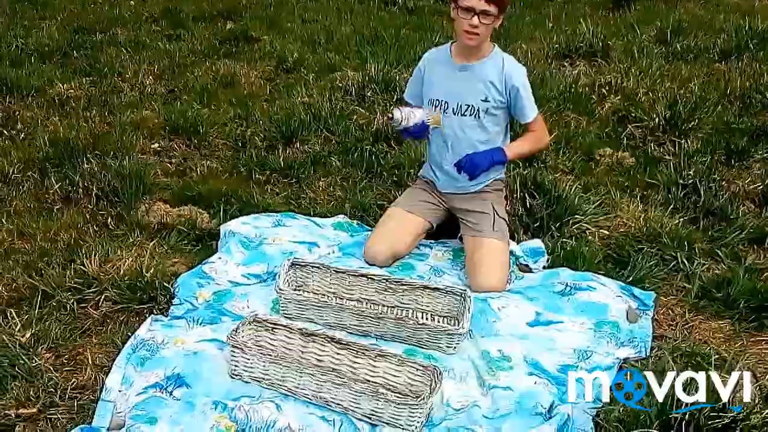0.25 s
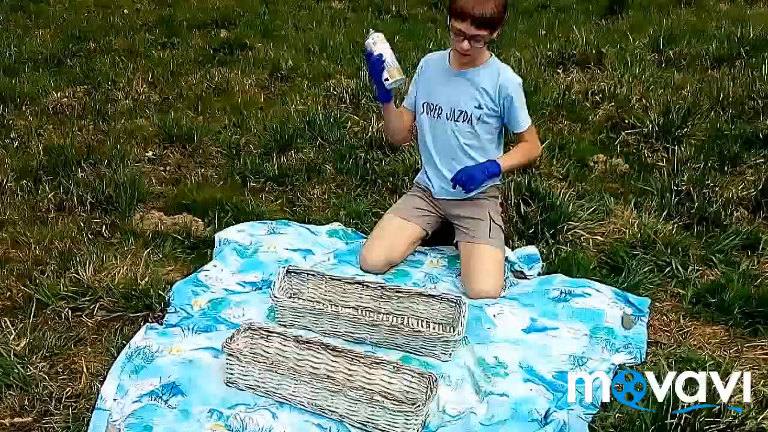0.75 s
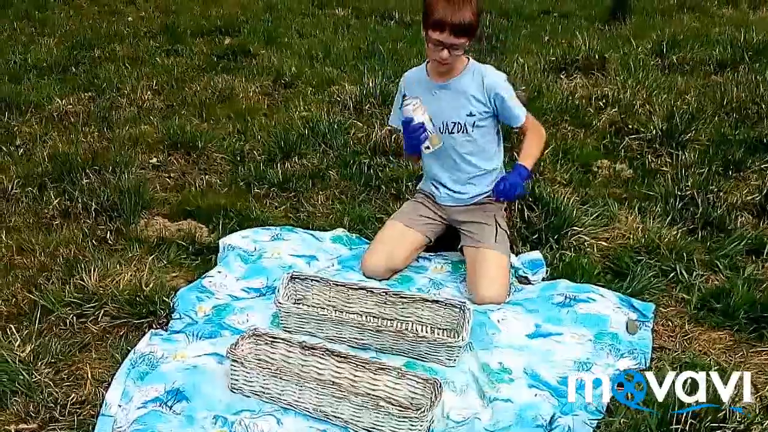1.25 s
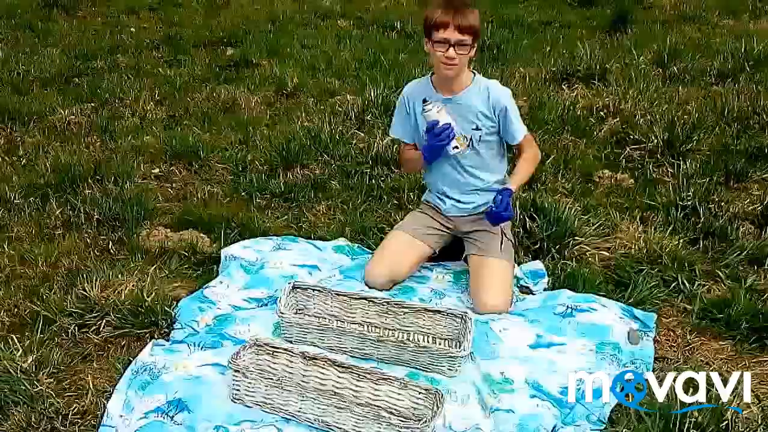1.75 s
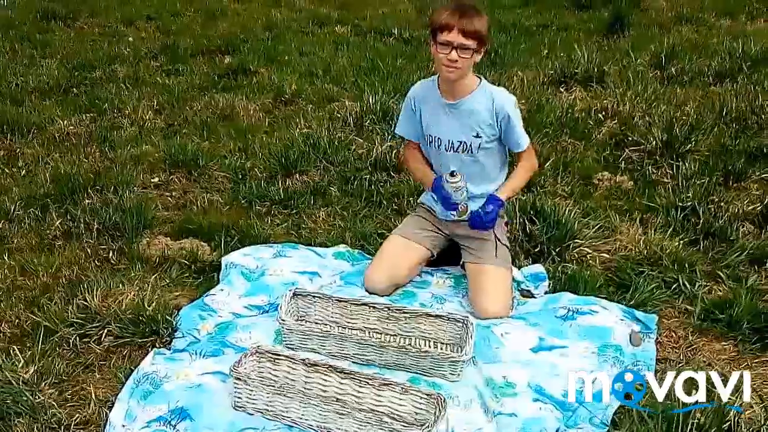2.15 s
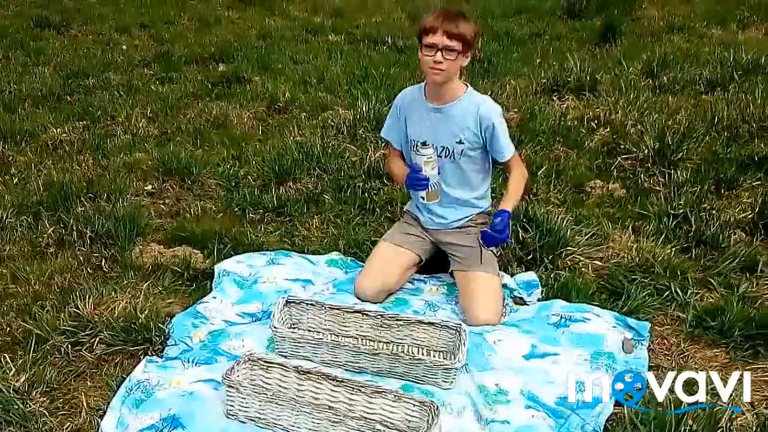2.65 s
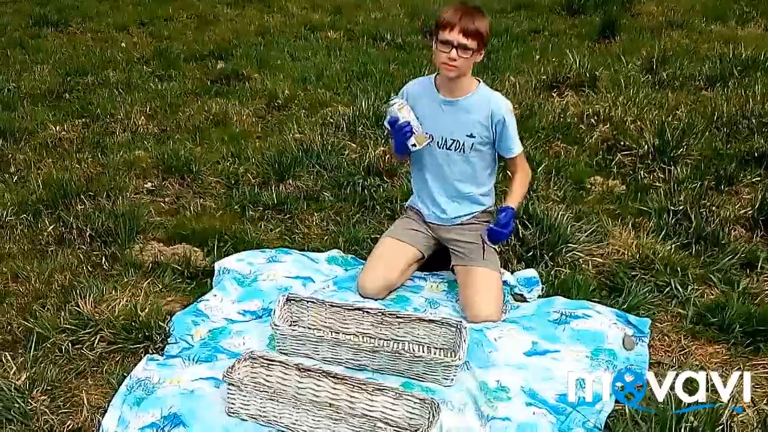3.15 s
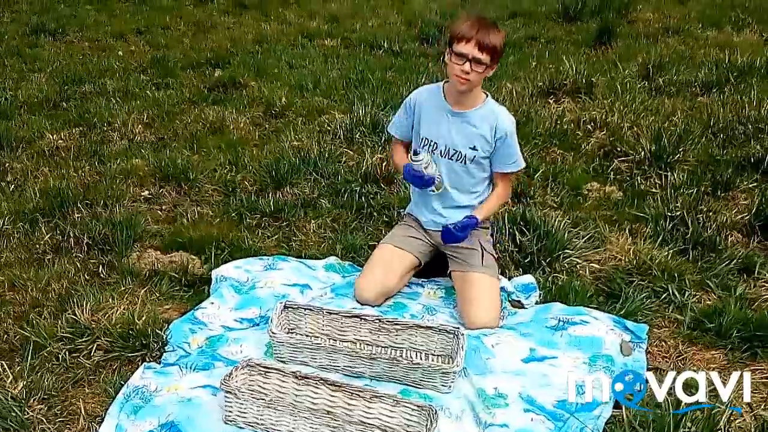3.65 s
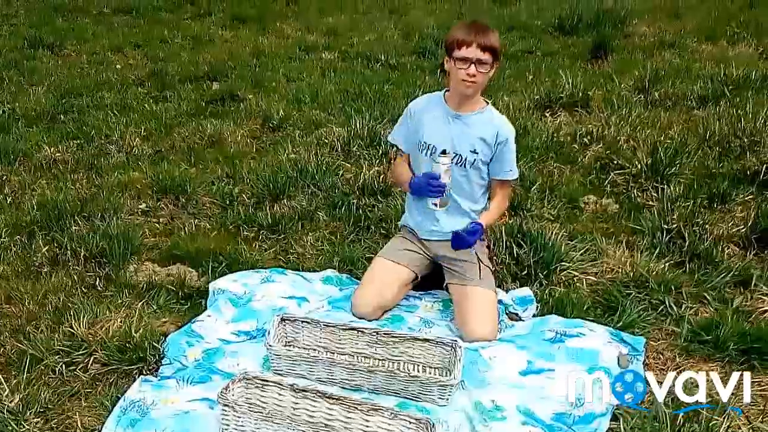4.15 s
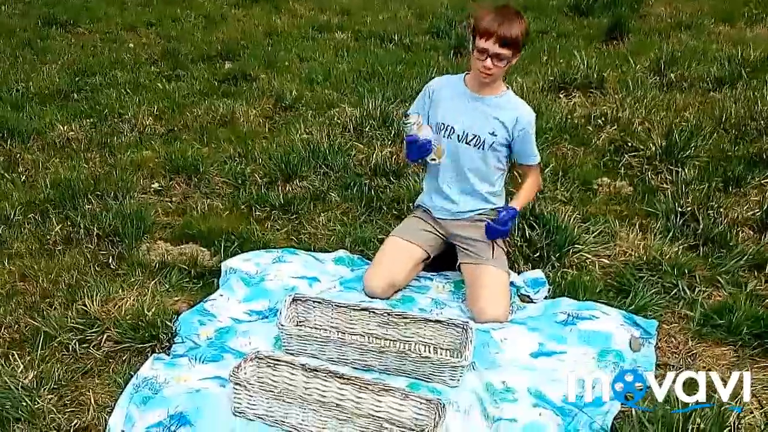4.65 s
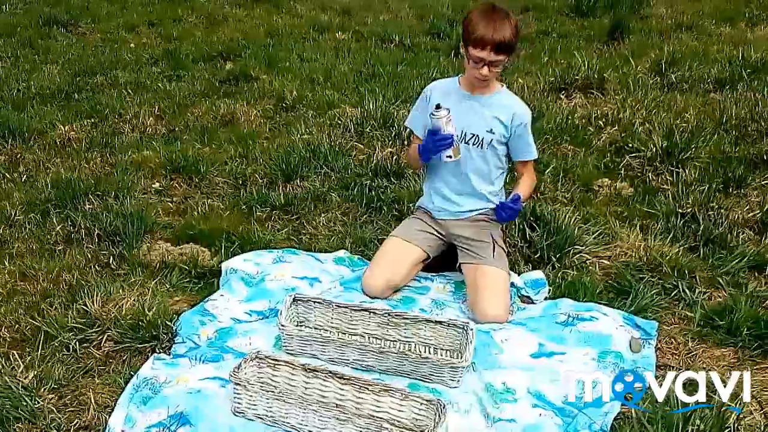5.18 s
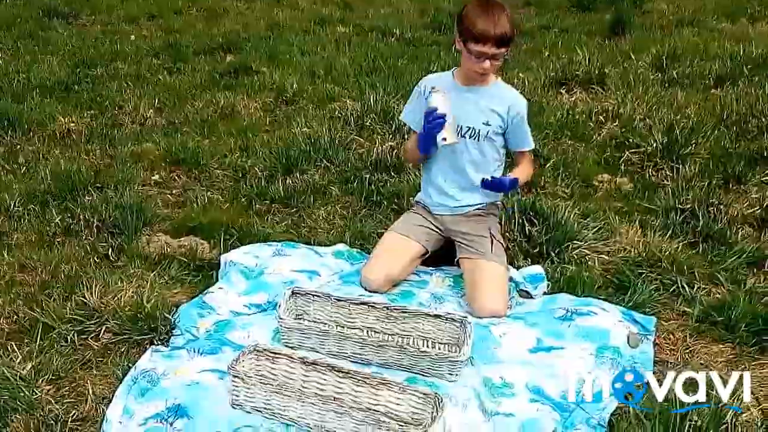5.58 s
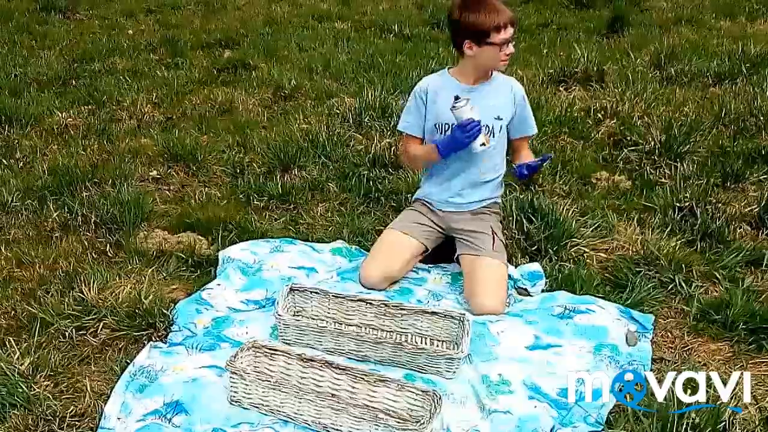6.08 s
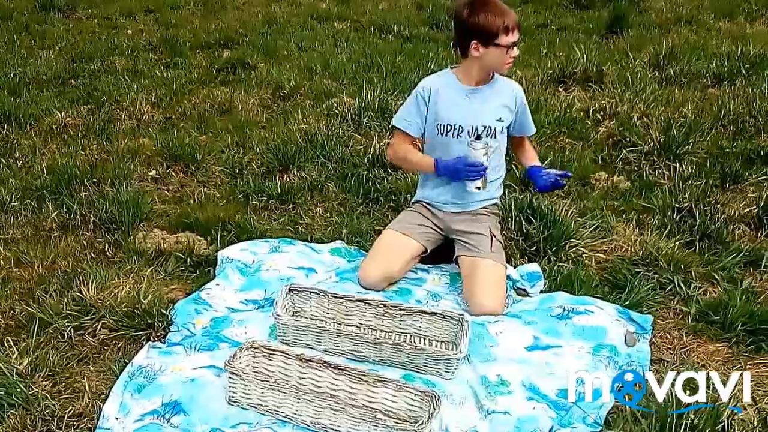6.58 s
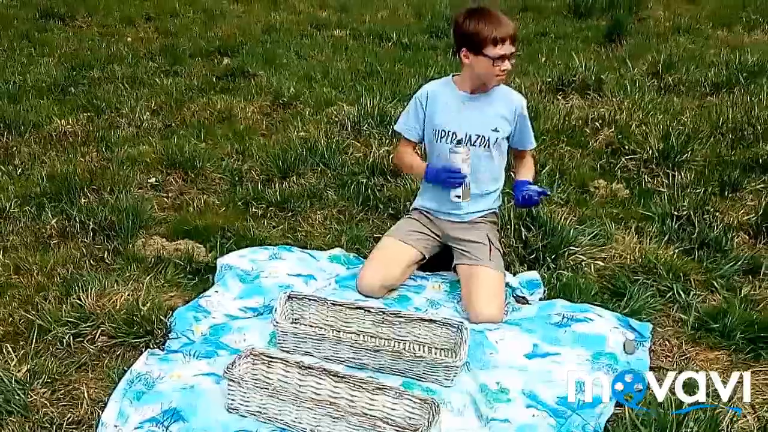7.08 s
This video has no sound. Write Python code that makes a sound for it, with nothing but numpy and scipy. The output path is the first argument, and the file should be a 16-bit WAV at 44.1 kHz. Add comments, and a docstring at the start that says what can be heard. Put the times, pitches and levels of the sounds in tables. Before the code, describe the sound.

A spray paint can is shaken by hand in an open meadow, its mixing ball clacking in uneven metallic rattles to the end over faint birds

```python
"""Open air with a faint, distant rumble comes first, then far bird notes and a soft bump on the microphone.
Soon a can of spray paint is shaken by hand, a few metres away in a meadow: its mixing ball knocks on the
ends and wall, exciting the can's modes, and rolls through the paint between knocks in many soft touches.
Birds are sliding sines with echoes, the air is coloured noise and the rumble two narrow noise bands.
Now and then a hand bumps or brushes the microphone's housing: short thuds, snaps and swells of noise."""
import sys
import numpy as np
from scipy import signal
from scipy.fft import rfft, irfft
from scipy.io import wavfile

SR = 44100
rng = np.random.default_rng(int(sys.argv[2]) if len(sys.argv) > 2 else 0)


def materialize(psi):
    """Save the field psi as 16-bit PCM at rate SR to the path in sys.argv[1].

    A 1-D psi becomes a single channel; in a 2-D psi each row is a channel.
    """
    bounded = np.clip(np.atleast_2d(psi).T, -1, 1)
    quanta = np.round(bounded * 32767).astype(np.int16)
    wavfile.write(sys.argv[1], SR, quanta)


N = 322812
TIME = np.arange(N) / SR

# hard knocks of the ball against the can, a few to each shake; levels before the part trims:
# start_s, cap_level_db, wall_level_db
KNOCKS = [(0.7844, -43.5, -68), (0.8001, -41, -64), (0.8239, -44.5, -72), (0.9898, -35, -58),
          (1.0004, -39, -60), (1.0112, -38.5, -60), (1.0326, -41.5, -59), (1.0654, -39, -73),
          (1.0868, -34, -50), (1.1056, -32.5, -66), (1.1138, -37, -52), (1.1242, -39.5, -51),
          (1.1386, -37, -39.5), (1.1917, -25.5, -37.5), (1.226, -45, -65), (1.374, -32.5, -47),
          (1.3928, -28.5, -52.5), (1.4186, -36, -49.5), (1.4542, -44, -41.5), (1.4664, -47, -43.5),
          (1.5207, -28, -41.5), (1.531, -33.5, -47), (1.6342, -30, -50), (1.6405, -26, -46),
          (1.6597, -39, -53), (1.6675, -29.5, -63), (1.7415, -40.5, -38.5), (1.7572, -42, -39),
          (1.7898, -34, -38), (1.8031, -30.5, -42), (1.9321, -27.5, -44.5), (1.9612, -33.5, -47.5),
          (2.0509, -30.5, -35), (2.0899, -34, -48.5), (2.2326, -27, -43.5), (2.2566, -41, -57),
          (2.3307, -30, -41), (2.3713, -41.5, -49), (2.5095, -33.5, -47), (2.5195, -39, -52),
          (2.5348, -39.5, -74), (2.6178, -30, -42.5), (2.8156, -34, -53), (2.8541, -44, -42),
          (2.8958, -30.5, -40.5), (2.9124, -36, -55), (3.0603, -29.5, -53), (3.085, -34.5, -60),
          (3.103, -39.5, -64), (3.188, -29.5, -38), (3.239, -52, -46), (3.3974, -36, -46.5),
          (3.4847, -32, -45), (3.532, -36, -46), (3.6587, -34, -49), (3.6786, -40.5, -51),
          (3.696, -39, -52), (3.7769, -30, -38), (3.7866, -33.5, -42), (3.8354, -43, -44),
          (3.941, -29, -41), (3.9756, -35.5, -56), (3.9848, -39, -63), (4.0613, -33, -42.5),
          (4.0876, -28.5, -51), (4.3801, -35.5, -44.5), (4.4427, -37.5, -51), (4.544, -35, -52.5),
          (4.5901, -40.5, -52), (4.6747, -33, -43), (4.7139, -33.5, -51), (4.7818, -45.5, -45),
          (4.8509, -29, -38.5), (4.8726, -28.5, -50), (4.9657, -34.5, -44), (4.971, -32, -42),
          (5.1691, -30.5, -62), (5.1833, -29.5, -43), (5.2084, -42.5, -60), (5.2689, -31, -39.5),
          (5.2849, -35.5, -41.5), (5.458, -40, -52.5), (5.584, -32.5, -42), (5.5904, -33.5, -43),
          (5.7537, -32, -49), (5.9026, -43.5, -62), (6.0408, -39, -47.5), (6.076, -41, -55),
          (6.1634, -34.5, -40), (6.3641, -38, -77), (6.4137, -42.5, -42), (6.4473, -38, -41.5),
          (6.462, -35.5, -42), (6.5465, -37.5, -54.5), (6.562, -37.5, -64), (6.6312, -41.5, -50.5),
          (6.7115, -34, -40), (6.7496, -42, -45.5), (7.0141, -35.5, -40), (7.041, -37.5, -44),
          (7.2209, -31, -50.5), (7.2892, -34, -39)]
# ranges in which the wall, the end caps and the contact tick sound: low_hz, high_hz
PART_RANGES = [(500, 2147), (2100, 8020), (9500, 23500)]
# modes of the can, damped by paint and hand, before each touch detunes and reweights them:
# pitch_hz, width_hz, level_db
CAN_MODES = [(776, 437, -11.5), (885, 134, -20), (1450, 230, -7), (1610, 156, -5), (2240, 104, -11),
             (2583, 284, 0), (3200, 790, -2.5), (3705, 273, 4), (4663, 810, 9.5), (5300, 180, 2),
             (5670, 1040, 4), (6620, 200, 1), (8580, 2350, -9), (12400, 2000, -13.5), (14970, 1200, -9.5)]
# paint coats the ball unevenly and dulls its tick:
# time_s, tick_above_caps_db, top_modes_db (the modes above 10 kHz)
COATING = [(0.8, -16.5, -1), (1.7, -27, 14), (2.8, -17, -2), (4.1, -18.5, 1), (4.7, -32, 11), (5.6, -34, 1),
           (6.0, -19.5, -15), (7.32, -23.5, -14)]
# once in each shake the ball runs along the wall: fastest_s, level_db
RUNS = [(1.031, -64), (1.13, -64), (1.462, -65), (2.06, -57.5), (2.319, -57.5), (2.592, -54.5), (2.88, -59),
        (3.171, -56.5), (3.451, -54.5), (3.751, -56.5), (4.02, -56), (4.2, -64.5), (4.408, -59),
        (4.63, -59.5), (4.978, -64), (5.27, -58.5), (5.532, -61), (5.829, -58.5), (6.101, -59),
        (6.44, -66.5), (6.72, -62.5), (7.02, -63), (7.271, -65.5)]
# at times the ball rattles densely and brightly, or the paint sloshes with a hiss:
# start_s, end_s, cap_level_db
FLURRIES = [(.8, .85, -54), (.99, 1.059, -48.5), (1.091, 1.166, -53), (3.41, 3.48, -56), (3.974, 4.0, -50),
            (5.819, 5.89, -60.5), (6.085, 6.149, -62.5)]
# soft bumps on the housing: start_s, level_db, pitch_hz
BUMPS = [(.238, -31.5, 206), (0.777, -43, 139.3), (1.271, -45.5, 295), (1.533, -45.5, 292),
         (1.61, -42.5, 264.5), (1.716, -42, 220.2), (2.013, -40, 358), (2.075, -43.5, 225),
         (3.938, -44.5, 356)]
# brushes over the housing: start_s, length_s, level_db
BRUSHES = [(0.317, 0.098, -52.5), (4.4, 0.115, -53.5)]
# colour of the brushes: frequency_hz, level_db (relative)
BRUSH_COLOUR = [(60, -2), (250, 0), (1500, -4), (4500, 1), (7500, -4), (11000, -15.5), (16000, -19)]
# dry snaps within a brush: start_s, peak_db
SNAPS = [(4.4098, -27.5), (4.417, -33), (4.4206, -28), (4.4277, -27), (4.497, -38)]
# high and low note of one bird's song: first_s, length_s, slide_s, start_hz, end_hz, level_db
SONG = [(0.861, 0.064, 0.0147, 5180, 4550, -51), (1.168, 0.11, 0.04, 3620, 3170, -60.5)]
# other bird notes: start_s, length_s, slide_s, start_hz, end_hz, level_db
WHISTLES = [(.21, .068, 0.025, 4560, 4500, -66.5), (.661, 0.092, .035, 3450, 3230, -65.5),
            (4.975, 0.019, 0.024, 2570, 2500, -60), (5.016, 0.03, 0.032, 3660, 3390, -61),
            (5.09, .031, .025, 2848, 2489, -62), (5.191, 0.11, 0.062, 3520, 3447, -63),
            (5.207, 0.11, .033, 5900, 5130, -60), (5.294, .03, 0.031, 4900, 3682, -56),
            (5.426, .041, .023, 4140, 4540, -56.5), (5.467, 0.035, .02, 4200, 3660, -57.5),
            (5.53, 0.029, 0.022, 4280, 3450, -64), (5.595, 0.069, 0.041, 4700, 3760, -66),
            (5.672, 0.024, .027, 4360, 3760, -53.5), (5.927, 0.099, 0.059, 2912, 2733, -61.5)]
# colour of the open air: frequency_hz, level_db (relative)
AIR_COLOUR = [(25, 14), (45, -3.5), (70, 6), (110, 0), (170, 1.5), (400, -2.5), (800, -3), (1600, -6.5),
              (3200, -8), (6000, -12), (8000, -20.5), (10500, -33), (16000, -23)]
# a distant hum: pitch_hz, level_db
HUM = [(101.5, -78), (121.6, -80)]

# the first knock after a pause lands squarely and ticks more sharply
PAUSE_S, FIRST_TICK_DB = 0.1, 5
# on average a square knock is over sooner than a glancing touch, whose tick is weaker
KNOCK_MEAN_CONTACT_MS, GLANCE_CONTACT_MS, GLANCE_TICK_DB = 1.61, 1.69, -2.5
# a hard knock is followed by a much softer rebound
REBOUND_MIN_S, REBOUND_MAX_S, REBOUND_CAP_LOSS_DB, REBOUND_WALL_LOSS_DB = 0.012, 0.045, 18, 8
# on each run the ball glances off the wall, louder than it rolls; the taps trail a little behind the swell
TAP_LAG_S, TAP_SPREAD_S, TAP_WALL_DB, TAP_CAP_DB, TAP_SCATTER_DB = 0.015, 0.1, 8, 5, 2.5
FLURRY_STEP_S, FLURRY_WALL_LOSS_DB, FLURRY_CONTACT_MS = 0.007, 15, 2.2
# late on the hand shifts its grip and the lowest modes ring more strongly
REGRIP_S, REGRIP_DB = 6.9, 4.5
# a run swells and dies away at steady rates; in between the ball keeps stirring faintly
SWELL_DB_PER_S, FADE_DB_PER_S = 115, 65
STIR_FROM_S, STIR_DB = 0.55, -69.5
# just before a knock the ball flies free and the rolling falls quiet
FLIGHT_S, FLIGHT_HUSH_DB = 0.012, 6.5
SONG_PERIOD_S = 0.506
CUTOFF_HZ = 16000


def knocks(chatter=0.11, linger=0.98, spot_db=2.0, detune=0.032, rounding=6,
           trims_db=(-0.3, -0.3, -2), usual_tick_db=-18, hardness=0.63):
    """Each touch is a contact impulse with a brief chatter; where it lands decides how the modes share it."""
    t = np.arange(1024) / SR
    level_span = 0.005 * SR  # a part's level is its loudness as if spread over 5 ms
    filters = [band_pass(low, high, order=3) for low, high in PART_RANGES]
    mode_hz = np.array(CAN_MODES)[:, 0]
    treble_octaves = np.maximum(np.log2(mode_hz / 7500), 0)
    lowest, highest = mode_hz < 1100, mode_hz > 10000
    coat_s, coat_tick_db, coat_top_db = np.transpose(COATING)
    out = np.zeros(N)
    for s, cap_db, wall_db, contact_ms, extra_tick_db in contacts():
        tick_db = cap_db + np.interp(s, coat_s, coat_tick_db) + extra_tick_db
        # an impulse, then a chatter that grows and lasts with the contact time
        chatter_decay_s = linger * contact_ms / 1000
        force = chatter * contact_ms * rng.standard_normal(len(t)) * np.exp(-t / chatter_decay_s)
        force[0] += 1
        # a weaker echo from the ground or a nearby body follows within about 2 ms
        force[np.argmin(np.abs(t - rng.uniform(0.0012, 0.0024)))] += 0.3
        # a touch cushioned by paint has a weak tick and excites the highest modes less
        bright_db = hardness * (tick_db - cap_db - usual_tick_db) * treble_octaves
        spot, shift = rng.standard_normal((2, len(CAN_MODES)))
        coat_db = np.interp(s, coat_s, coat_top_db) * highest
        grip_db = REGRIP_DB * (s > REGRIP_S) * lowest
        gains_db = spot_db * spot + bright_db + coat_db + grip_db
        ring = ring_can(force, gains_db, 1 + detune * shift, rounding)
        for sos, level_db, trim_db in zip(filters, (wall_db, cap_db, tick_db), trims_db):
            part = signal.sosfilt(sos, ring)
            part *= np.sqrt(level_span) / np.linalg.norm(part)
            add(out, s, from_db(level_db + trim_db) * part)
    return out


def contacts(taps_per_run=7):
    """Knocks, rebounds, taps and flurries as (start_s, cap_level_db, wall_level_db, contact_ms, extra_tick_db)."""
    hard, glancing, last_s = [], [], 0
    for s, cap_db, wall_db in KNOCKS:
        contact_ms = KNOCK_MEAN_CONTACT_MS * rng.uniform(0.5, 1.5)
        hard.append((s, cap_db, wall_db, contact_ms, FIRST_TICK_DB * (s - last_s > PAUSE_S)))
        rebound_s = s + rng.uniform(REBOUND_MIN_S, REBOUND_MAX_S)
        glancing.append((rebound_s, cap_db - REBOUND_CAP_LOSS_DB, wall_db - REBOUND_WALL_LOSS_DB))
        last_s = s
    for s, db in RUNS:
        for place in np.linspace(-1, 1, taps_per_run):
            slip, cap, wall = rng.uniform(-1, 1, size=3)
            tap_s = s + TAP_LAG_S + TAP_SPREAD_S * (place + slip / taps_per_run)
            cap_db = db + TAP_CAP_DB + TAP_SCATTER_DB * cap
            wall_db = db + TAP_WALL_DB + TAP_SCATTER_DB * wall
            glancing.append((tap_s, cap_db, wall_db))
    # no glancing touches while the ball flies towards a knock
    soft = [(*touch, GLANCE_CONTACT_MS, GLANCE_TICK_DB) for touch in glancing
            if until_knock(touch[0]) > FLIGHT_S]
    flurries = []
    for start, end, db in FLURRIES:
        for s in np.arange(start, end, FLURRY_STEP_S):
            grain_s = s + FLURRY_STEP_S * rng.random()
            flurries.append((grain_s, db, db - FLURRY_WALL_LOSS_DB, FLURRY_CONTACT_MS, 0))
    return hard + soft + flurries


def ring_can(force, gains_db, shifts, rounding):
    """The can's modes in parallel; each gets a chance sign and a second, wider pole pair rounds its onset."""
    out = np.zeros(len(force))
    signs = rng.choice([-1, 1], len(CAN_MODES))
    for (hz, width_hz, db), gain_db, shift, sign in zip(CAN_MODES, gains_db, shifts, signs):
        mode = resonate(resonate(force, hz * shift, width_hz), hz * shift, width_hz * rounding)
        out += sign * from_db(db + gain_db) * mode
    return out


def rolling(size_db=4.0, dull_db=-6, hardness_db=-1.0, spot_db=4, detune=0.071, rounding=5,
            touch_decay_s=0.0017, hollow_db=-3, spot_count=96, touches_per_s=260):
    """Between knocks the ball skips through the paint in many soft touches, which favour the low modes."""
    t = np.arange(512) / SR
    mode_hz = np.array(CAN_MODES)[:, 0]
    octaves = np.log2(mode_hz / mode_hz[0])
    # every spot on the wall has its own colour
    spots = []
    for hardness in rng.standard_normal(spot_count):
        spot, shift = rng.standard_normal((2, len(CAN_MODES)))
        force = rng.standard_normal(len(t)) * np.exp(-t / touch_decay_s)
        tilt_db = (dull_db + hardness_db * hardness) * octaves
        spots.append(rms_one(ring_can(force, spot_db * spot + tilt_db, 1 + detune * shift, rounding)))
    swirl = np.zeros(N)
    for s in np.arange(0, N / SR, 1 / touches_per_s):
        size = from_db(size_db * np.clip(rng.standard_normal(), -2, 2))
        add(swirl, s + rng.random() / touches_per_s, size * spots[rng.integers(spot_count)])
    # the gas space above the paint colours the swirl hollow
    hollow = swirl + from_db(hollow_db) * resonate(swirl, 1600, 720)
    return roll_level() * rms_one(hollow)


def roll_level():
    """Rolling gain: a swell for each run over a faint stir, hushed while the ball is in flight."""
    power = from_db(STIR_DB) ** 2 * (TIME > STIR_FROM_S)
    for s, db in RUNS:
        drop_db = np.maximum(SWELL_DB_PER_S * (s - TIME), FADE_DB_PER_S * (TIME - s))
        power = power + from_db(db - drop_db) ** 2
    hush_db = FLIGHT_HUSH_DB * np.exp(-until_knock(TIME) / FLIGHT_S)
    return np.sqrt(power) * from_db(-hush_db)


def until_knock(s):
    """Time left from s to the next hard knock, in seconds."""
    knock_s = np.append(np.sort(np.array(KNOCKS)[:, 0]), np.inf)
    return knock_s[np.searchsorted(knock_s, s)] - s


def handling(bump_decay_s=0.00083, edge_db=-9, edge_decay_s=0.0016, snap_decay_s=0.00015, crest=0.74):
    """Bumps, brushes and snaps on the housing reach the microphone directly."""
    out, t = np.zeros(N), np.arange(2048) / SR
    for s, db, hz in BUMPS:
        pulse = 2 * np.sin(2 * np.pi * hz * t) * np.exp(-t / bump_decay_s)
        thud = signal.sosfilt(band_pass(144, 1050), pulse)
        scrape = rng.standard_normal(len(t)) * np.exp(-t / edge_decay_s)
        edge = signal.sosfilt(band_pass(400, 4300), scrape)
        add(out, s, from_db(db) * (thud + from_db(edge_db) * edge / np.abs(edge).max()))
    for s, db in SNAPS:
        burst = rng.standard_normal(len(t)) * np.exp(-t / snap_decay_s)
        snap = signal.sosfilt(band_pass(500, 6600), burst)
        add(out, s, from_db(db) * snap / np.abs(snap).max())
    pressure = np.zeros(N)
    for s, length, db in BRUSHES:
        # crest: how far through the stroke it is loudest
        stroke = np.interp(TIME, [s, s + crest * length, s + length], [0, 1, 0])
        pressure += from_db(db) * stroke ** 0.42
    return out + pressure * coloured_noise(BRUSH_COLOUR)


def birds(waver=0.012, wet_db=-6.5):
    """Each whistle is a wavering sine that slides onto its pitch; far trees throw it back."""
    out, wobble = np.zeros(N), 1 + waver * drift(130)
    for s, length, slide, start_hz, end_hz, db in song_notes() + list(WHISTLES):
        t = np.arange(int(length * SR)) / SR
        hz = np.interp(t, [0, slide], [start_hz, end_hz]) * wobble[int(s * SR):][:len(t)]
        swell = np.sqrt(np.abs(np.sin(np.pi * t / length)))
        add(out, s, from_db(db) * swell * np.sin(2 * np.pi * np.cumsum(hz) / SR))
    return out + outdoors(out, t60=0.7, wet_db=wet_db, delay=0.04)


def song_notes(count=6):
    """One bird alternates its high and low note at a steady pace, one pair to each period."""
    notes = []
    for k in range(count):
        first_s, *shape = SONG[k % 2]
        notes.append((first_s + k // 2 * SONG_PERIOD_S, *shape))
    return notes


def meadow(air_db=-66, hum_width_hz=6.3):
    """A steady wash of open air, with a wavering hum far away made of narrow bands of noise."""
    out = from_db(air_db) * coloured_noise(AIR_COLOUR)
    for hz, db in HUM:
        band = resonate(rng.standard_normal(N), hz, hum_width_hz)
        out += from_db(db) * rms_one(resonate(band, hz, hum_width_hz))
    return out


def outdoors(x, t60, wet_db, delay):
    """Sound scattered back by the surroundings: sparse echoes that die away (t60 and delay in seconds)."""
    t = np.arange(SR // 2) / SR
    # cubing the noise leaves a few strong echoes among weak ones
    echoes = rng.standard_normal(len(t)) ** 3 * from_db(-60 * t / t60) * (t > delay)
    return from_db(wet_db) * signal.fftconvolve(x, echoes / np.linalg.norm(echoes))[:N]


def coloured_noise(spectrum):
    """Noise of unit rms with the given spectrum."""
    hz, db = np.transpose(spectrum)
    bins_hz = np.arange(1, N // 2 + 2) * SR / N
    gain = from_db(np.interp(np.log(bins_hz), np.log(hz), db))
    return rms_one(irfft(rfft(rng.standard_normal(N)) * gain, N))


def drift(rate):
    """Smooth chance of unit rms that changes about rate times a second."""
    steps = rng.standard_normal(N // 20)
    return rms_one(np.interp(TIME * rate, np.arange(len(steps)), steps))


def resonate(x, hz, width_hz):
    """A two-pole resonance with a gain of about 1 on top."""
    r = np.exp(-np.pi * width_hz / SR)
    zeros = np.array([1, 0, -1]) * (1 - r * r) / 2
    poles = [1, -2 * r * np.cos(2 * np.pi * hz / SR), r * r]
    return signal.lfilter(zeros, poles, x)


def band_pass(low_hz, high_hz, order=2):
    """Sections of a Butterworth band-pass, its upper edge held to 0.45 of the sample rate at most."""
    return signal.butter(order, [low_hz, min(high_hz, 0.45 * SR)], "band", fs=SR, output="sos")


def from_db(db):
    """Decibels to gain."""
    return 10 ** (np.asarray(db) / 20)


def rms_one(x):
    """Scale to unit rms."""
    return x / np.sqrt(np.mean(x ** 2) + 1e-20)


def add(track, s, sound):
    """Mix a sound into a track at time s."""
    start = max(int(s * SR), 0)
    track[start:start + len(sound)] += sound[:max(N - start, 0)]


def scene():
    """The can with its near and far scatter, the hand noises, birds and air."""
    can = knocks() + rolling()
    near = outdoors(can, t60=0.038, wet_db=-17, delay=0.0017)
    far = outdoors(can, t60=0.49, wet_db=-35.5, delay=0.015)
    surroundings = handling() + birds() + meadow()
    return (can + near + far + surroundings)[None, :]


def record(dry, port_hz=14800, port_width_hz=700, port_db=7, low_cut_hz=60):
    """The microphone loses the deep bass and its port rings high in the treble; the top is cut."""
    thin = signal.sosfilt(signal.butter(2, low_cut_hz, "high", fs=SR, output="sos"), dry)
    coloured = thin + from_db(port_db) * resonate(thin, port_hz, port_width_hz)
    return signal.sosfilt(signal.ellip(8, 0.2, 70, CUTOFF_HZ, fs=SR, output="sos"), coloured)


dry = scene()
out = record(dry)
materialize(out)
```